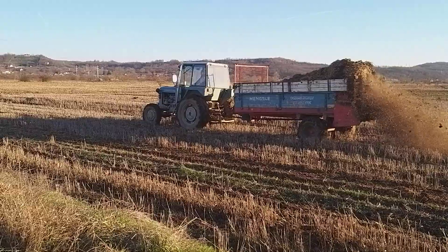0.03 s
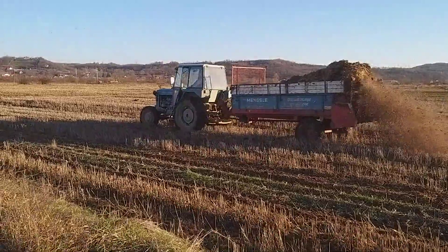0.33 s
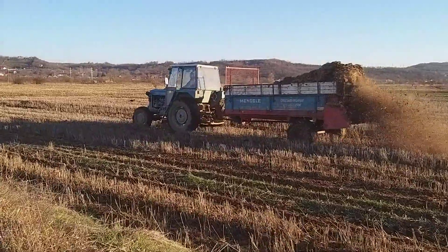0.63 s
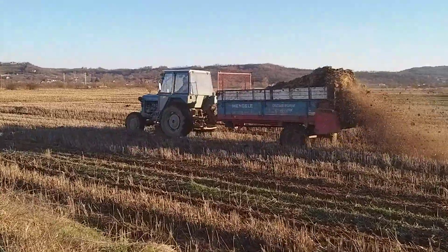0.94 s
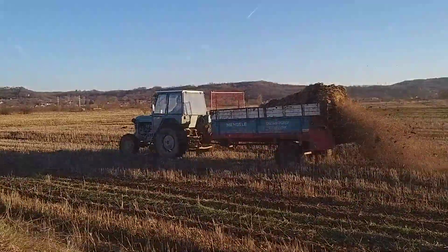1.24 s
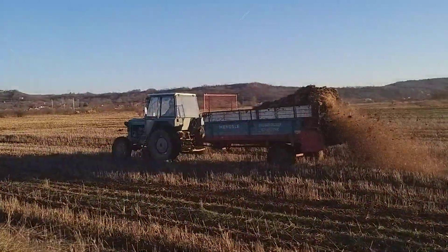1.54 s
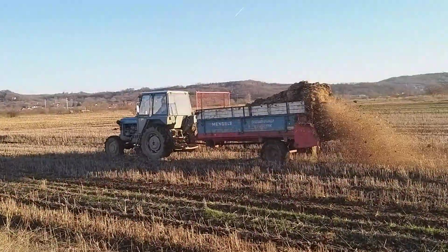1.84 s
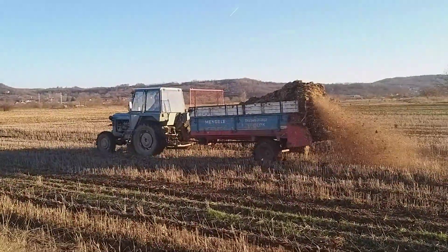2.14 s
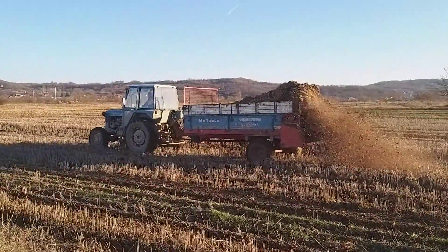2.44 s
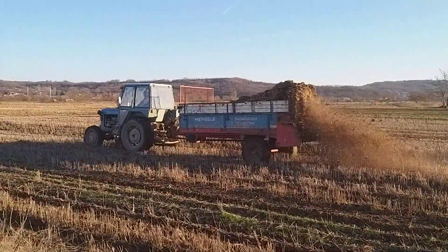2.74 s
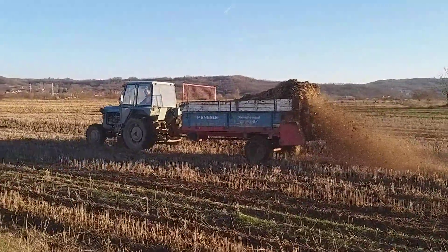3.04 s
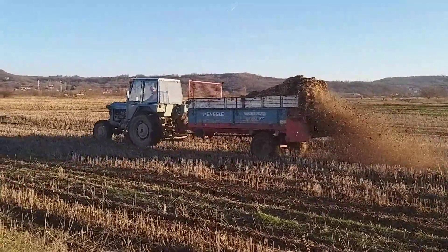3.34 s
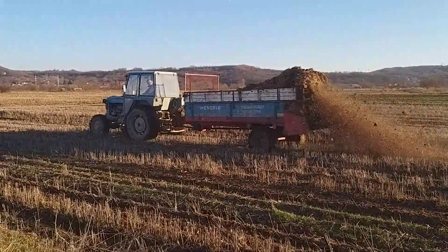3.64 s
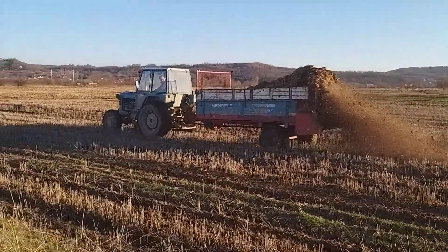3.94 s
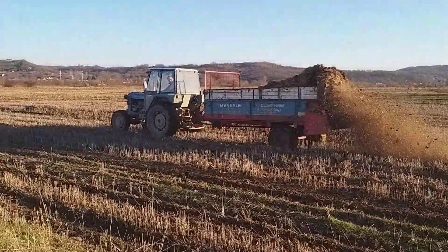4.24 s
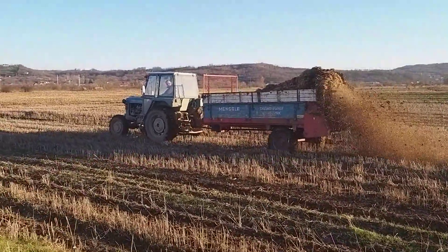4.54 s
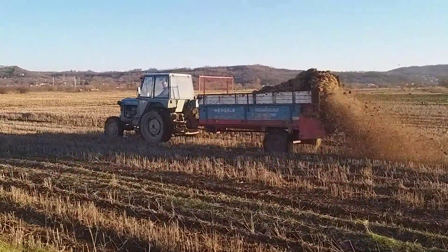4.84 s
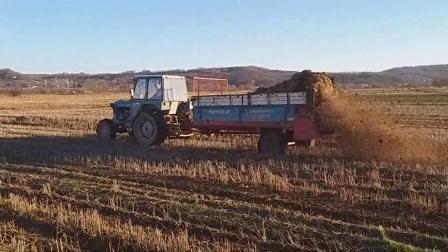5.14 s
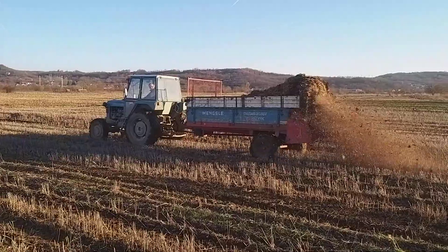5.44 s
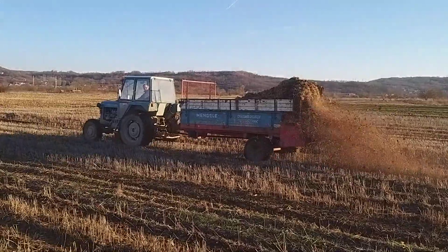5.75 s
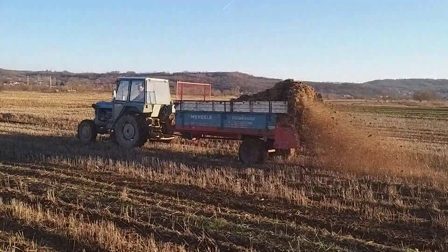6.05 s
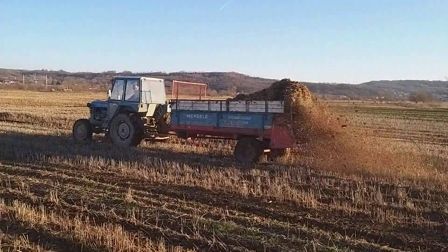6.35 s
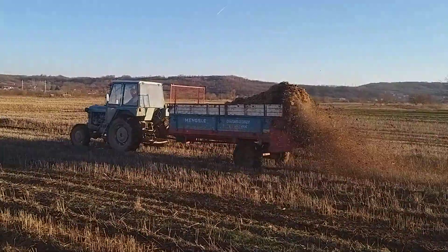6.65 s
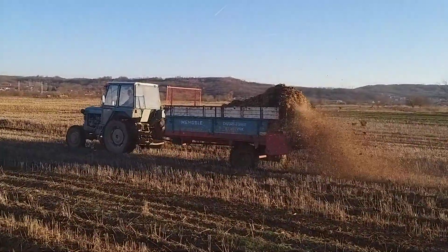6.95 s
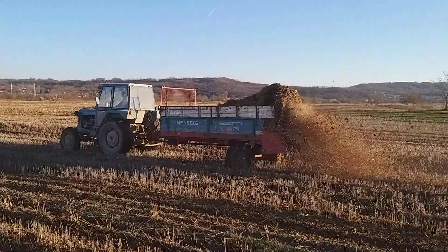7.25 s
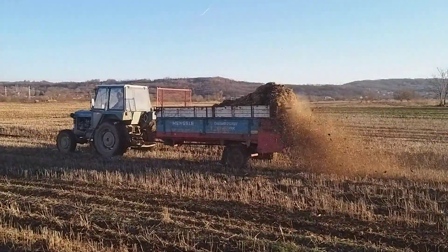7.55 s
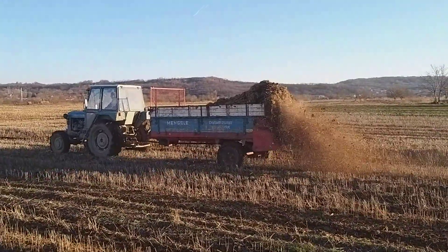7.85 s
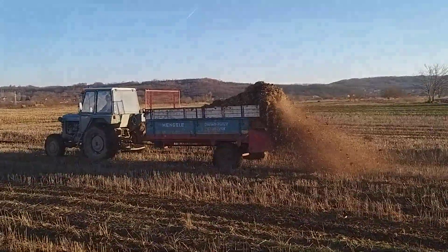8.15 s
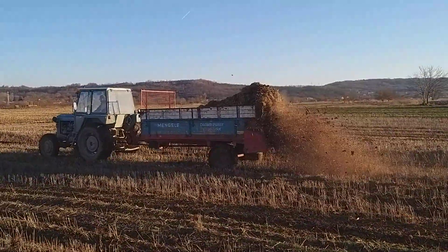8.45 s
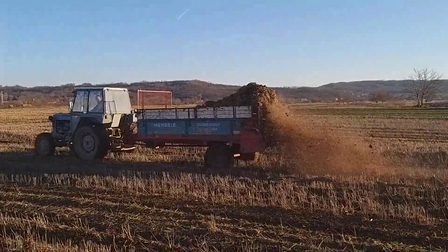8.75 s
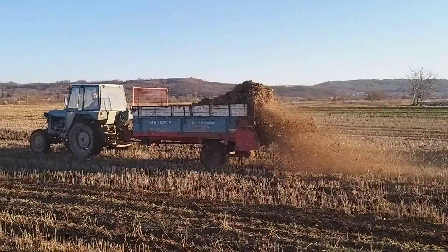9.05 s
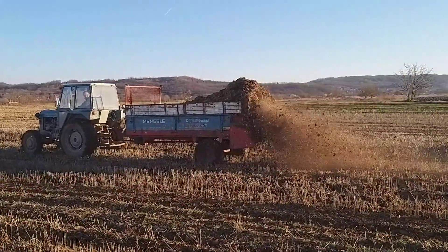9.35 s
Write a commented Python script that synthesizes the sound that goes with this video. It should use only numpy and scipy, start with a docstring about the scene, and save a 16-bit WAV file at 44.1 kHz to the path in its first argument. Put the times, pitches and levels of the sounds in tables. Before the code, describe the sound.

A diesel tractor pulls a working manure spreader across an open field, some way off. The engine holds a steady speed, with a low exhaust throb and a hard knock slightly to the left. The sound starts quieter and rises to full level at about 1 second. Throughout, the spreader's metal body rattles and flung straw and clods patter and hiss over the stubble. A ratchet clanks and squeaks every two thirds of a second. A drive chain ticks and clinks quickly, snapping harder on and off from about 1.5 to 6 seconds and again after 7.5. Lumps occasionally knock on the steel, around 3, 4.5 and 9 seconds. From 6 seconds the exhaust fades slightly. A few soft, dull bumps come just after 7 seconds, and the patter thins briefly around 8. A light breeze buffets the microphone from about 2 seconds, strongest near 8.

```python
"""A four-cylinder diesel tractor pulls a working manure spreader across an open field, some way off.
Firings ring the exhaust pipe and knock in the engine block, on the left; behind it the beaters rattle
the spreader and fling clods. Geared to the engine, the floor ratchet clanks and squeaks every two
thirds of a second and a drive chain ticks and clinks. A light breeze buffets the microphones.
The overall level starts low and comes up after a second, like a recorder's gain rising."""
import sys
import numpy as np
from scipy import signal
from scipy.fft import rfft, irfft
from scipy.io import wavfile
from scipy.ndimage import map_coordinates

SR = 44100
rng = np.random.default_rng(int(sys.argv[2]) if len(sys.argv) > 2 else 0)


def master(y):
    """Save y as 16-bit WAV."""
    cut = np.clip(np.atleast_2d(y).T, -1, 1)
    pcm = np.round(cut * 32767)  # scale
    wavfile.write(sys.argv[1], SR, pcm.astype(np.int16))


N = 419832
T = np.arange(N) / SR


def gain_of(db):
    """Decibels to amplitude."""
    return 10 ** (np.asarray(db) / 20)


def unit_rms(x):
    """Scales to rms 1."""
    return x / np.sqrt(np.mean(x ** 2) + 1e-20)


def at_hz(spectrum, hz):
    """Interpolates on a log-frequency axis."""
    f, value = np.transpose(spectrum)
    return np.interp(np.log(hz + 1), np.log(f + 1), value)


def curves(rows):
    """Each column of a time table at every sample."""
    times_s, *columns = np.transpose(rows)
    return [np.interp(T, times_s, column) for column in columns]


def add(mix, at_s, sound):
    """Mixes a sound in, in place."""
    part = mix[..., max(round(at_s * SR), 0):][..., :sound.shape[-1]]
    part += sound[..., :part.shape[-1]]


def colour(x, spectrum, size=8192):
    """Minimum-phase filter; output at rms 1."""
    log_gain = np.log(gain_of(at_hz(spectrum, abs(np.fft.fftfreq(size, 1 / SR)))))
    impulse = np.fft.ifft(np.exp(np.conj(signal.hilbert(log_gain)))).real[:size // 2]
    return unit_rms(signal.oaconvolve(np.atleast_2d(x), impulse[None], axes=1)[:, :x.shape[-1]])


def equalise(x, spectrum):
    """Zero-phase filter."""
    return irfft(rfft(x) * gain_of(at_hz(spectrum, np.fft.rfftfreq(N, 1 / SR))), N)


def wander(hz):
    """Random drift, low-passed at hz, rms about 1."""
    coarse_s = T[::100]
    f = np.fft.rfftfreq(len(coarse_s), coarse_s[1])
    spectrum = rfft(rng.standard_normal(len(coarse_s))) / (1 + (f / hz) ** 2)
    return np.interp(T, coarse_s, unit_rms(irfft(spectrum, len(coarse_s))))


def grains(per_s, spread_db):
    """Impacts of random time, size and sign."""
    size = gain_of(spread_db * np.minimum(rng.exponential(1, N), 4))
    return unit_rms(size * rng.choice([-1, 1], N) * (rng.random(N) < per_s / SR))


def place(x, lead_ms):
    """A point source reaches the left microphone lead_ms before the right."""
    x = x.ravel()
    delayed = np.arange(N) - lead_ms * SR / 1000
    return np.array([x, map_coordinates(x, [delayed], order=3)])


# Left-right likeness: (frequency [Hz], correlation [0-1])
COHERENCE = [(30, 0.032), (60, 0.036), (130, 0.89), (290, 1), (700, 0.94), (1100, 0.87), (1500, 1),
             (3000, 0), (15000, 0)]

def widen(a, b):
    """Two unrelated signals become a stereo pair, alike from low to middle frequencies."""
    likeness = np.clip(at_hz(COHERENCE, np.fft.rfftfreq(N, 1 / SR)), -1, 1)
    mid, side = rfft(a) * np.sqrt(1 + likeness), rfft(b) * np.sqrt(1 - likeness)
    return unit_rms(irfft(np.array([mid + side, mid - side]), N))


# Breeze strength: (time [s], level [dB])
BREEZE_LEVEL = [(0, -60), (2.2, -38), (4.6, -42.5), (8.2, -27), (9.52, -36)]
# Low buffet: (frequency [Hz], level [dB])
BUFFET_SPECTRUM = [(20, -16), (60, 1.5), (150, 3), (220, -1), (350, -11), (700, -17), (2000, -83)]

def breeze(gust_db=4):
    """Air buffets each microphone with lumpy low noise."""
    buffets = rng.standard_normal((2, N)) * gain_of(gust_db * np.clip(wander(hz=2.1), -2, 2))
    return gain_of(curves(BREEZE_LEVEL)[0]) * colour(buffets, BUFFET_SPECTRUM)


# Dull bumps: (time [s], relative peak [dB])
THUMP_HITS = [(7.109, -11), (7.138, -6.5), (7.341, -7.5), (7.436, -25)]

def thumps(fade_s=0.044, left_db=-6, right_db=1):
    """A few dull bumps, mostly on the right."""
    out, t = np.zeros((2, N)), np.arange(SR // 6) / SR
    for at_s, db in THUMP_HITS:
        bump = colour(rng.standard_normal((2, len(t))) * np.exp(-t / fade_s), BUFFET_SPECTRUM)
        add(out, at_s, gain_of(db) * bump / abs(bump).max())
    return out * gain_of([[left_db], [right_db]])


def clinks(level_db=-44, per_s=90, low_hz=2100, high_hz=6400, t60_s=0.07, spread_db=3, tilt_db_oct=-2.5):
    """Loose links and tines touch at random, each with its own short note."""
    out, t = np.zeros((1, N)), np.arange(SR // 8) / SR
    for when, pitch, chance in rng.random((round(per_s * T[-1]), 3)):
        hz = low_hz * (high_hz / low_hz) ** pitch
        db = spread_db * min(-np.log(chance), 3) + tilt_db_oct * np.log2(hz / low_hz)
        add(out, when * T[-1], gain_of(db - 60 * t / t60_s) * np.sin(2 * np.pi * hz * t))
    return gain_of(level_db) * unit_rms(out)


# Link contact: (frequency [Hz], level [dB])
LINK_SPECTRUM = [(500, -34), (1500, 6), (2500, 7.5), (3500, 8), (5000, 9.5), (6000, 10), (6450, 8.5),
                 (7100, 0.5), (7700, -2), (10000, -8), (16000, -30)]
# Steel link ring: (frequency [Hz], level [dB], t60 [s])
LINK_RING = [(2688, 9, 0.079), (3620, 5, .08), (4440, 7, 0.05), (5170, 0, 0.055), (6200, 2, .05)]

def crunch(db, fade_s=0.038, contacts_per_s=450, ring_db=-4, detune=0.03):
    """A dying cluster of small contacts rings the steel links."""
    t = np.arange(SR // 8) / SR
    contacts = rng.random(len(t)) < contacts_per_s / SR
    rings = np.zeros(len(t))
    for hz, mode_db, t60_s in LINK_RING:
        forces = contacts * rng.standard_normal(len(t))
        mode = gain_of(mode_db - 60 * t / t60_s) * np.sin(2 * np.pi * hz * rng.normal(1, detune) * t)
        rings += signal.fftconvolve(forces, mode)[:len(t)]
    grit = colour(rng.standard_normal(len(t)) ** 3, LINK_SPECTRUM, size=512)
    return gain_of(db) * unit_rms(grit + gain_of(ring_db) * unit_rms(rings)) * np.exp(-t / fade_s)


def tick(db, treble_db, snap_db=1.5, top_db=7, snap_s=0.0028, top_s=0.0015):
    """A stiff link snaps over the sprocket; the top treble dies first."""
    t = np.arange(SR // 50) / SR
    snap = colour(rng.standard_normal(len(t)) * np.exp(-t / snap_s), LINK_SPECTRUM, size=512)
    top = colour(rng.standard_normal(len(t)) * np.exp(-t / top_s), FIZZ_SPECTRUM, size=512)
    snap, top = snap / abs(snap).max(), top / abs(top).max()
    return gain_of(db) * (gain_of(snap_db) * snap + gain_of(treble_db + top_db) * top)


# Ordinary tick strength: (time [s], level [dB])
TICK_LEVEL = [(.8, -18.5), (1.6, -17), (2.6, -25), (5.5, -14), (6.45, -25.5), (7.2, -19.5), (7.9, -26),
              (9.52, -20)]
# Chain snags, plus one hard clod at 3.64 s that snaps the same way: (time [s], snap level [dB], treble offset
# [dB], loose-link level [dB])
CHAIN_SNAGS = [(1.592, -14.5, -7, -38), (1.907, -12, -12, -32), (2.064, -20, -7, -29),
               (2.222, -15, -18, -31), (2.379, -11, -14, -24), (2.535, -13, -6, -34),
               (2.692, -12.5, -8, -26.5), (2.848, -16, -20, -28), (3.161, -17, -5, -26.5),
               (3.3215, -17, -8, -33), (3.64, -16, -24, -29), (3.9495, -16.5, -4, -24.5),
               (4.106, -19.5, -2, -28), (4.742, -19, -3, -28), (4.901, -17, -4, -33),
               (5.0607, -16, -4, -25.5), (5.219, -16, -7, -33), (5.3785, -18, -6, -25),
               (5.5383, -17, -14, -27.5), (5.694, -10.5, 1, -26), (5.8513, -16, -9, -32),
               (6.0092, -20, -2, -24), (6.172, -20, -16, -29), (7.4354, -14.5, -24, -41),
               (7.595, -15.5, -10, -34), (7.9103, -19, -20, -33), (8.0696, -18, -16, -34),
               (8.3845, -17, -22, -27.5), (8.7004, -13.5, -23, -29), (8.8587, -15.5, -14, -27.5),
               (9.0174, -15, -8, -31), (9.495, -14, -14, -27.5)]

def chain(lead_ms, crank_turns_per_tick=4.4292, first_turn=0.868, uneven_db=2.5):
    """The geared chain ticks once a turn, or snags and snaps; loose links clatter after each."""
    out, snags_s = np.zeros((1, N)), np.transpose(CHAIN_SNAGS)[0]
    turns = crank_turns()
    for at_s in np.interp(np.arange(first_turn, turns[-1], crank_turns_per_tick), turns, T):
        force, edge_db = rng.standard_normal(2)
        if abs(snags_s - at_s).min() > 0.05:
            db = np.interp(at_s, *np.transpose(TICK_LEVEL)) + uneven_db * force
            add(out, at_s, tick(db, treble_db=edge_db - 11.5))
            add(out, at_s, crunch(db - 12))
    for at_s, db, treble_db, links_db in CHAIN_SNAGS:
        add(out, at_s, tick(db, treble_db))
        add(out, at_s, crunch(links_db))
    return place(out, lead_ms)


# Spreader's steel frame: (frequency [Hz], level [dB], t60 [s])
FRAME_MODES = [(556, -9, .07), (644, -2, 0.13), (729, 6.5, .13), (838, 0.5, .08), (1030, -2.5, 0.11),
               (1096, 2, .17), (1186, -9, .06), (1270, -1.5, 0.091), (1505, -11, 0.11), (2015, -7.5, 0.1),
               (2440, -7, .04), (3580, 0, 0.0088), (5100, -5, 0.018)]

def frame_ring(t, tilt_db_oct=0, scatter_db=3, detune=0.013):
    """One blow on the frame; each excites the modes a little differently."""
    ring = np.zeros(len(t))
    for hz, db, t60_s in FRAME_MODES:
        struck_db = db + tilt_db_oct * np.log2(hz) + scatter_db * rng.standard_normal()
        cycles = hz * rng.normal(1, detune) * t + rng.random()
        ring += gain_of(struck_db - 60 * t / t60_s) * np.sin(2 * np.pi * cycles)
    return ring / abs(ring).max()


# Lumps on the frame: (time [s], peak [dB])
LUMP_HITS = [(3.17, -15.5), (4.665, -15.5), (8.625, -17), (9.345, -17)]
# Hard clods in the beaters: (time [s], level [dB])
CLOD_HITS = [(3.005, -23), (3.614, -24), (5.359, -27), (6.961, -33), (7.665, -30.5), (7.97, -35),
             (8.63, -37), (8.894, -26.5), (8.97, -34), (9.341, -32)]

def load(lead_ms):
    """Lumps knock on the frame and hard clods clatter through the beaters."""
    out, t = np.zeros((1, N)), np.arange(SR // 8) / SR
    for at_s, db in LUMP_HITS:
        add(out, at_s, gain_of(db) * frame_ring(t))
    for at_s, db in CLOD_HITS:
        add(out, at_s, crunch(db))
    return place(out, lead_ms)


def squeak(length_s, hz, width_hz, stutter_hz=34):
    """Dry steel sticks and slips: a narrow, stuttering whistle."""
    t = np.arange(round(length_s * SR)) / SR
    noise = rng.standard_normal((2, len(t)))
    skirt = [(-4, -50), (-1, -12), (0, 0), (1, -12), (4, -50)]
    band = [(hz + widths * width_hz, db) for widths, db in skirt]
    slips = 1 + 2 * np.sin(2 * np.pi * (stutter_hz * t + rng.random()))
    return unit_rms(colour(noise, band, size=2048) * slips) * np.sqrt(np.hanning(len(t)))


# Pawl blow and rebounds: (delay [s], level [dB])
PAWL_BOUNCES = [(0, 0), (.0069, -4), (.0136, -6)]
# Ratchet strokes: (time [s], clank [dB], tilt [dB/octave], pivot squeak [dB], return squeal [dB])
RATCHET_STROKES = [(.347, -25, -5, -54, -40.5), (.998, -23.5, -2, -45, -58), (1.649, -27, 1.5, -37, -39),
                   (2.305, -23.5, -0.5, -36, -35.5), (2.963, -25, 0.5, -40, -38),
                   (3.615, -25, 1.5, -47, -38.5), (4.271, -24, 0, -40, -38.5), (4.932, -25.5, 1, -42, -38),
                   (5.596, -24, -0.5, -48, -35), (6.259, -27.5, 0, -43, -37),
                   (6.917, -28.5, -2.5, -45, -34), (7.576, -26.5, -0.5, -41, -41),
                   (8.234, -25.5, 1, -52, -46), (8.895, -26.5, 0, -48, -41)]

def ratchet(scrape_db=-6, scrape_s=0.1, squeak_lead_s=0.008, return_s=0.11, seat_s=0.015, damp_s=0.027):
    """The pawl strikes the frame, bounces, seats and damps it; its pivot squeaks, the arm squeals back."""
    out, t = np.zeros((2, N)), np.arange(SR // 8) / SR
    damping = np.exp(-np.maximum(t - seat_s, 0) / damp_s)
    for at_s, db, tilt_db_oct, squeak_db, squeal_db in RATCHET_STROKES:
        clank = np.zeros(len(t))
        for delay_s, bounce_db in PAWL_BOUNCES:
            add(clank, delay_s * rng.uniform(0.93, 1), gain_of(bounce_db) * frame_ring(t, tilt_db_oct))
        scrape = colour(rng.standard_normal((2, len(t))), SPRAY_SPECTRUM, size=1024)
        pivot = squeak(length_s=0.04, hz=13150, width_hz=160)
        arm = squeak(length_s=0.14, hz=rng.normal(6400, 60), width_hz=320)
        add(out, at_s, gain_of(db) * unit_rms(clank * damping))
        add(out, at_s, gain_of(db + scrape_db) * scrape * np.exp(-t / scrape_s))
        add(out, at_s - squeak_lead_s, gain_of(squeak_db) * pivot)
        add(out, at_s + return_s, gain_of(squeal_db) * arm)
    return out


# Manure flow through the beaters: (time [s], level [dB])
MANURE_FLOW = [(1.0, 2), (1.55, 3.5), (2.0, 2), (7.1, 1), (7.55, -4), (8.1, -5.5), (8.8, -0.5)]
# Patter of straw and clods: (frequency [Hz], level [dB])
SPRAY_SPECTRUM = [(500, 2.5), (1400, 2), (2000, 7), (2550, 7), (3200, 5), (5000, 4), (6000, 3), (6550, 4),
                  (7000, -5.5), (7600, -16.5), (10000, -18), (16000, -25)]
# Fine top-treble fizz: (frequency [Hz], level [dB])
FIZZ_SPECTRUM = [(4000, -24), (7500, 2), (9000, 8), (11000, 14), (13000, 14.5), (15600, 14.5), (16500, 10)]

def spray(lead_ms, gain_cut, patter_db=-34, extra_cut_db=-0.5, fizz_db=-43.5, clump_db=1):
    """Torn straw and clods leave the beaters in clumps and patter over the stubble, where stalks snap."""
    clumps = gain_of(clump_db * wander(hz=30.2))
    thrown = 0.32 * place(grains(per_s=4000, spread_db=7.5), lead_ms)
    landing = np.array([grains(per_s=7000, spread_db=5), grains(per_s=7000, spread_db=4)])
    dust = rng.standard_normal((2, N))
    stalks = 0.27 * place(grains(per_s=110, spread_db=4.5), lead_ms)
    patter = gain_of(patter_db + extra_cut_db * gain_cut) * colour(thrown + landing, SPRAY_SPECTRUM)
    fizz = gain_of(fizz_db) * colour(dust + stalks, FIZZ_SPECTRUM)
    return gain_of(curves(MANURE_FLOW)[0]) * (clumps * patter + np.sqrt(clumps) * fizz)


# Spreader body: (frequency [Hz], level [dB])
BODY_SPECTRUM = [(200, -19), (400, -6.5), (560, -4), (680, -1), (850, -1.5), (960, -3), (1120, -7),
                 (1300, -10.5), (1650, -10), (2000, -16.5), (2550, -15.5), (3200, -33.5), (7000, -34)]

def rattle(flutter_db=2, ring_db=-9.5):
    """Beaters and loose boards drum on the spreader's body and keep its frame ringing."""
    blows = widen(grains(per_s=2500, spread_db=1), grains(per_s=2500, spread_db=4))
    t = np.arange(SR // 6) / SR
    rings = sum(signal.oaconvolve(grains(per_s=90, spread_db=-0.5), frame_ring(t))[:N] for _ in range(3))
    flutter = gain_of(flutter_db * wander(hz=15))
    return flutter * (colour(blows, BODY_SPECTRUM) + gain_of(ring_db) * unit_rms(rings))


# Engine speed: (time [s], speed [rpm])
ENGINE_RPM = [(0, 1707.5), (1, 1699), (4, 1685), (5, 1671.5), (8, 1683.5), (9.5, 1670.5)]

def crank_turns():
    """Crankshaft turns so far, at every sample."""
    return np.cumsum(curves(ENGINE_RPM)[0]) / SR / 60


# Cylinders in firing order: (cycle phase [0-1], level [dB])
FIRING_ORDER = [(.071, -3.5), (.325, 0), (0.593, 7), (.833, 0)]

def firings(uneven_db=0.1, start_phase=0.108):
    """One pulse a firing; each cylinder fires once in two crank turns."""
    cycles = start_phase + crank_turns() / 2
    pulses = np.zeros(N)
    for phase, db in FIRING_ORDER:
        fired = np.flatnonzero(np.diff(np.floor(cycles - phase)))
        pulses[fired] += gain_of(db + uneven_db * rng.standard_normal(len(fired)))
    return pulses


def puffs(pulses, fade_s, floor):
    """An envelope that jumps at each pulse and fades towards a floor."""
    fading = unit_rms(signal.lfilter([1], [1, -np.exp(-1 / (fade_s * SR))], pulses))
    return unit_rms(fading + floor)


# Engine block: (frequency [Hz], level [dB])
BLOCK_SPECTRUM = [(400, -18.5), (900, 5), (1250, 7), (1650, 1.5), (2200, -2), (2700, -8), (4000, -6),
                  (6500, -21.5), (7600, -22), (16000, -82)]

def knock(pulses, lead_ms, trim_db=-1):
    """Each combustion shakes the block in a short bright burst, over steady noise."""
    bursts = rng.standard_normal(N) * puffs(np.sign(pulses), fade_s=0.0093, floor=2.9)
    return gain_of(trim_db) * place(colour(bursts, BLOCK_SPECTRUM), lead_ms)


# Exhaust pipe resonances: (frequency [Hz], level [dB])
PIPE_SPECTRUM = [(25, -39.5), (42, -40), (56, -3.5), (84, -9), (112, 2), (140, -16), (155, 3.5), (168, 8),
                 (183, -3), (200, -3), (235, -20), (300, -14.5), (420, -35), (900, -67.5)]
# Turbulent gas: (frequency [Hz], level [dB])
ROAR_SPECTRUM = [(16, -51), (32, -15), (50, -16), (80, -5), (130, -5), (170, -2.5), (200, -1.5), (225, 2.5),
                 (260, -6.5), (310, -14), (400, -16), (800, -30), (2000, -51)]

def exhaust(pulses, note_db=-3, roar_db=-4.5, uneven_db=1.6):
    """Firings ring the pipe, over a roar of gas that swells with the strong cylinders."""
    gas = widen(*rng.standard_normal((2, N))) * puffs(pulses, fade_s=0.03, floor=0.25)
    roar = gain_of(roar_db + uneven_db * wander(hz=36)) * colour(gas, ROAR_SPECTRUM)
    return gain_of(note_db) * colour(pulses, PIPE_SPECTRUM) + roar


# Stubble reflection, upright in the bass, inverted higher up: (frequency [Hz], gain [dB])
ECHO_UPRIGHT = [(250, -8), (500, -9.5), (850, -10.5), (1150, -31), (2000, -60)]
ECHO_INVERTED = [(700, -34), (1200, -10.5), (1800, -5.5), (2400, -9.5), (3500, -25), (6500, -36)]
# Microphone pair's side response, with metallic peaks: (frequency [Hz], gain [dB])
SIDE_RESPONSE = [(600, 0), (910, 1.5), (1200, -3), (1480, -1.5), (1630, 3), (1735, -2), (1840, 3),
                 (1990, -3), (2330, 1.5), (2600, 4), (3000, -1), (4400, 1.5), (7000, 0)]

def over_field(pair, echo_ms):
    """The ground echo cuts dips that sink as its delay grows; the microphones colour the side signal."""
    mid, side = pair.mean(0), (pair[0] - pair[1]) / 2
    reflected = equalise(mid, ECHO_UPRIGHT) - equalise(mid, ECHO_INVERTED)
    mid = mid + place(reflected, echo_ms)[1]
    side = equalise(side, SIDE_RESPONSE)
    return np.array([mid + side, mid - side])


# Passing rig: (time [s], spreader's lead at the left microphone [ms], ground echo delay [ms])
RIG_PATH = [(0, -0.08, 1.2), (2.3, -0.06, 1.245), (3.8, -0.096, 1.485), (5.8, -0.032, 1.565),
            (9.52, 0.023, 1.74)]
# Knock and rattle as the rig passes: (time [s], level [dB])
CLATTER_LEVEL = [(.8, -1), (1.25, 0.6), (2.0, -1), (5.4, 1.1), (6.6, 0), (9.52, 0)]

def scene(exhaust_db=-21, clatter_db=-29.5, engine_lead_ms=0.21, gain_rise_at_s=1, gain_rise_s=0.17,
          exhaust_cut_db=-13.5, rest_cut_db=-11.5, away_at_s=6, away_db_per_s=-0.81):
    """The overall level starts low and comes up; the exhaust fades as the tractor draws away."""
    gain_cut = np.exp(-np.maximum(T - gain_rise_at_s, 0) / gain_rise_s)  # 1 before the rise, 0 after
    away_db = away_db_per_s * np.maximum(T - away_at_s, 0)
    lead_ms, echo_ms = curves(RIG_PATH)
    pulses = firings()
    throb = gain_of(exhaust_db + exhaust_cut_db * gain_cut + away_db) * exhaust(pulses)
    clatter = knock(pulses, lead_ms + engine_lead_ms) + rattle()
    clatter *= gain_of(clatter_db + curves(CLATTER_LEVEL)[0])
    blows = ratchet() + load(lead_ms) + chain(lead_ms) + place(clinks(), lead_ms) + thumps()
    rest = over_field(clatter + spray(lead_ms, gain_cut), echo_ms) + blows + breeze()
    return throb + gain_of(rest_cut_db * gain_cut) * rest


def record(dry, start_s=0.069, cutoff_hz=15950):
    """A moment of silence, then the sound, low-passed."""
    lowpass = signal.firwin(511, cutoff_hz, window=("kaiser", 9), fs=SR)
    return signal.oaconvolve(dry * (T > start_s), lowpass[None], "same")


dry = scene()
out = record(dry)
master(out)
```